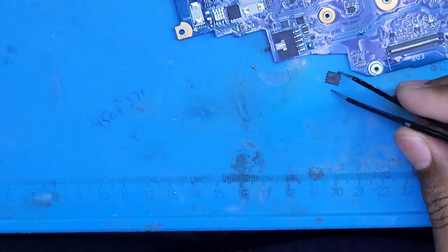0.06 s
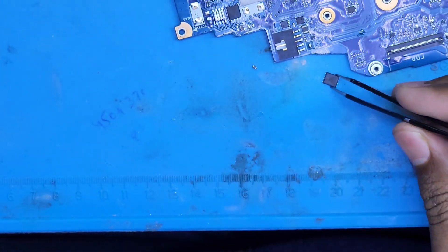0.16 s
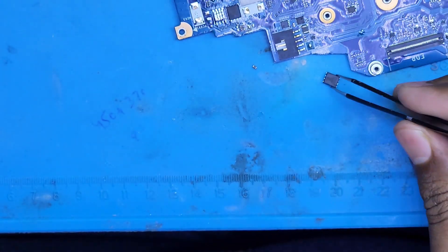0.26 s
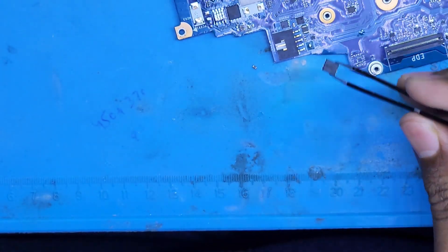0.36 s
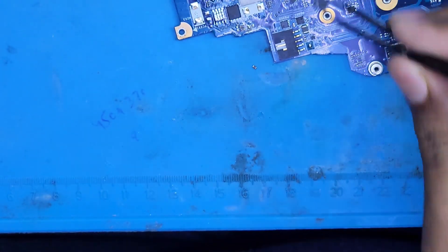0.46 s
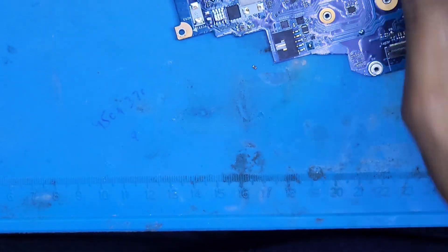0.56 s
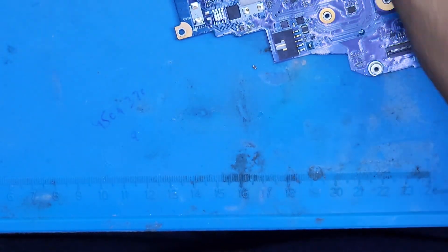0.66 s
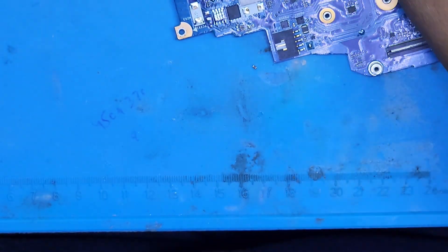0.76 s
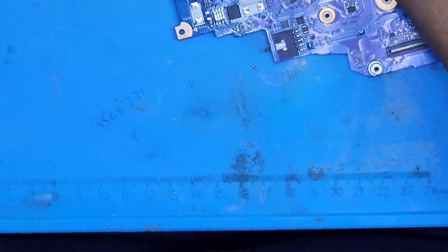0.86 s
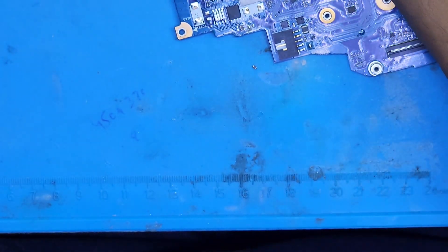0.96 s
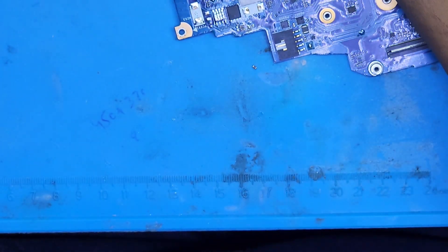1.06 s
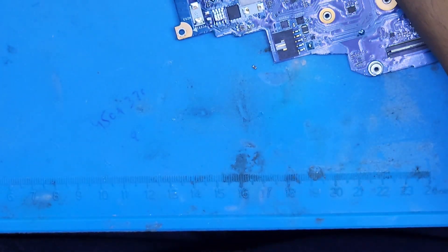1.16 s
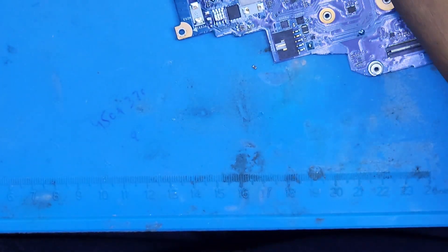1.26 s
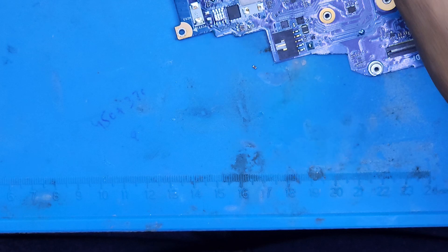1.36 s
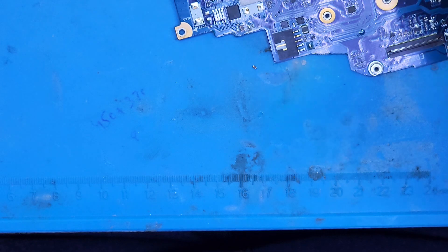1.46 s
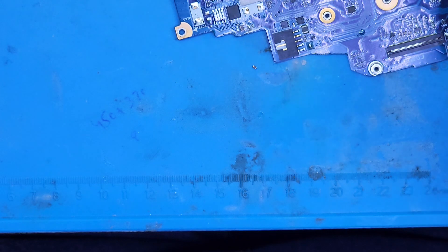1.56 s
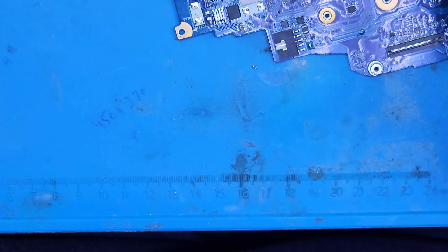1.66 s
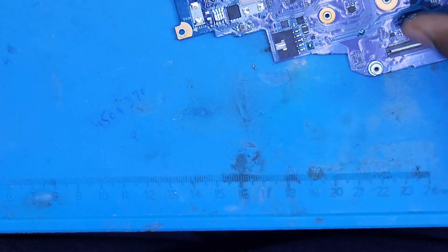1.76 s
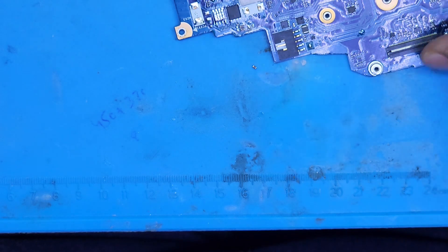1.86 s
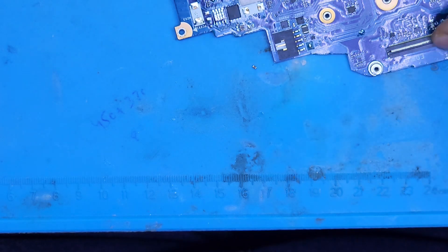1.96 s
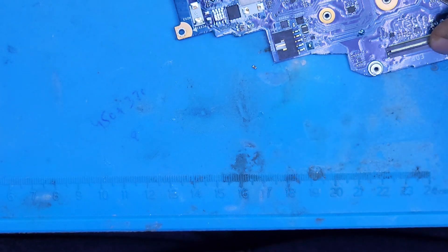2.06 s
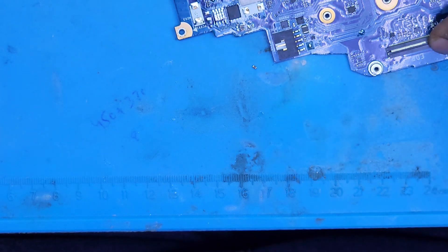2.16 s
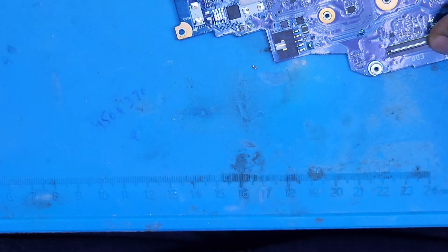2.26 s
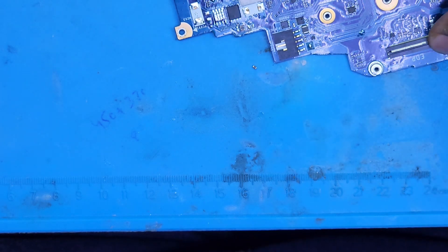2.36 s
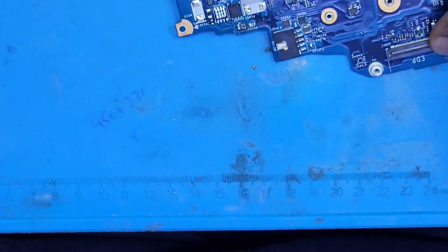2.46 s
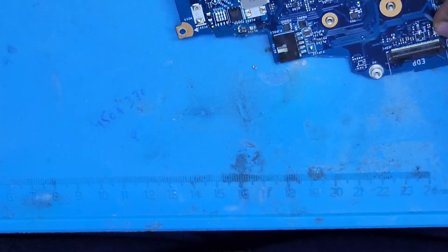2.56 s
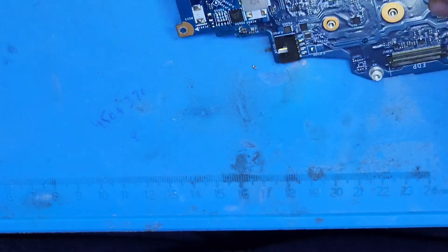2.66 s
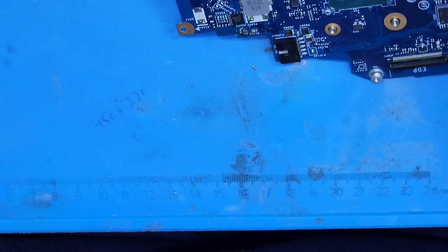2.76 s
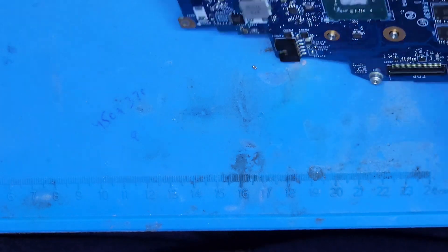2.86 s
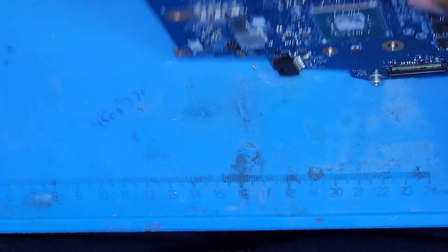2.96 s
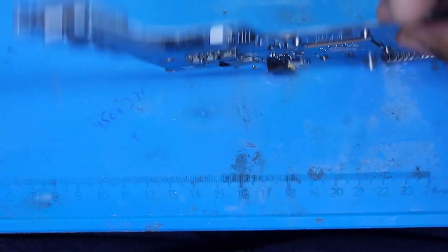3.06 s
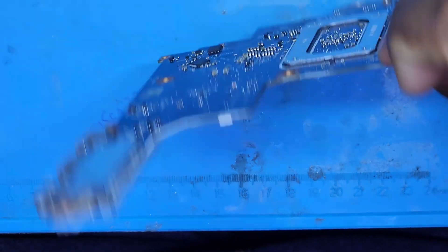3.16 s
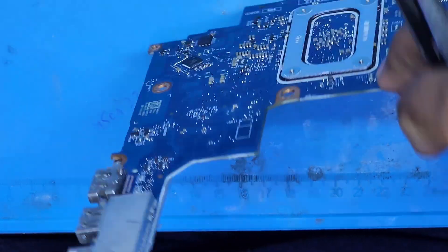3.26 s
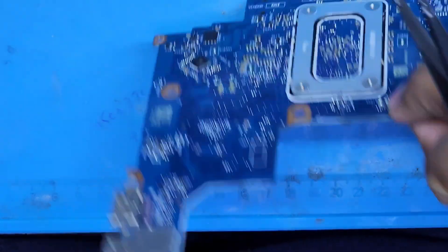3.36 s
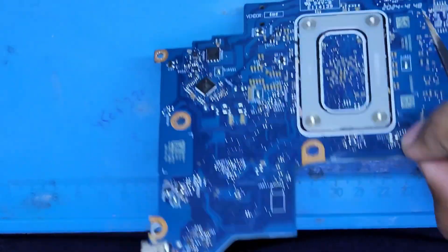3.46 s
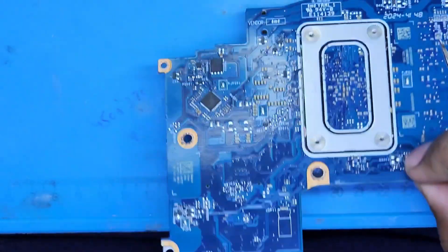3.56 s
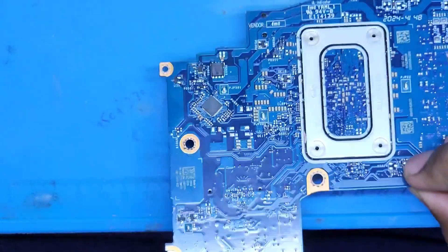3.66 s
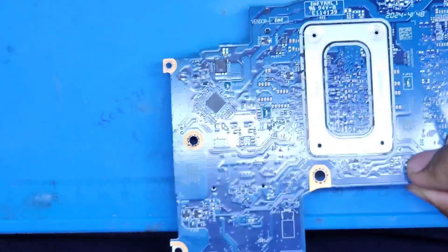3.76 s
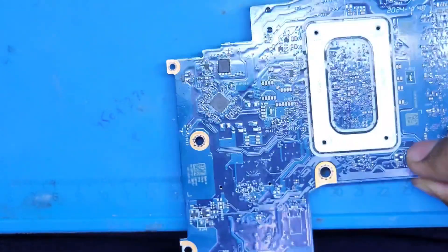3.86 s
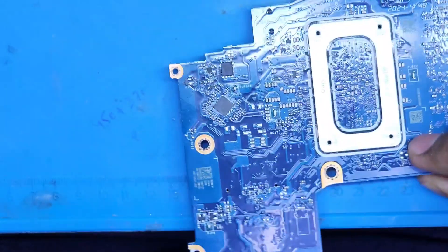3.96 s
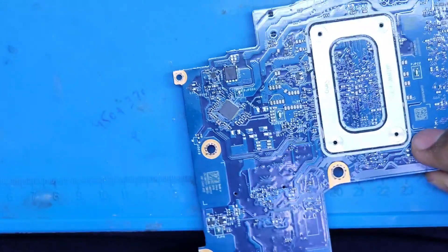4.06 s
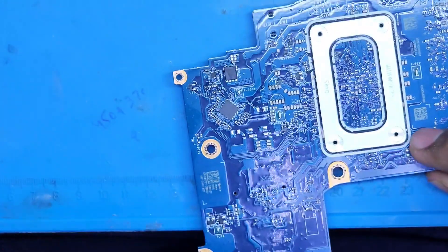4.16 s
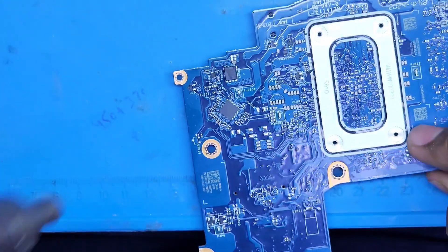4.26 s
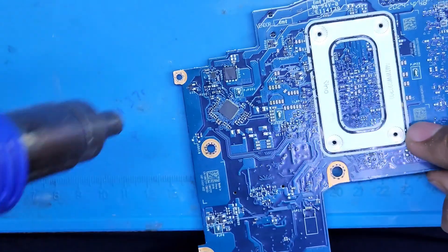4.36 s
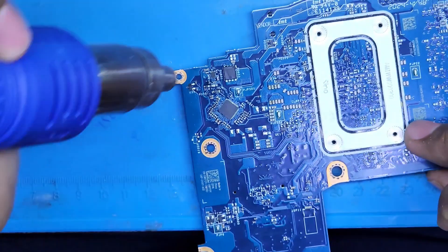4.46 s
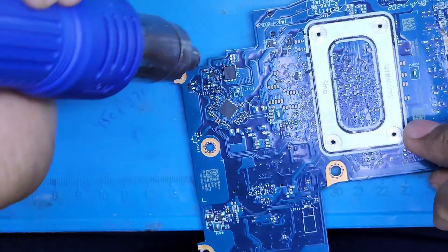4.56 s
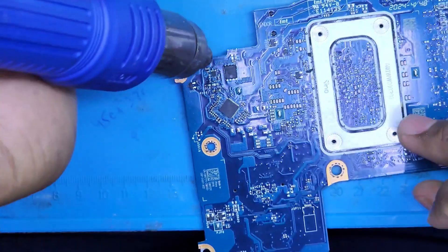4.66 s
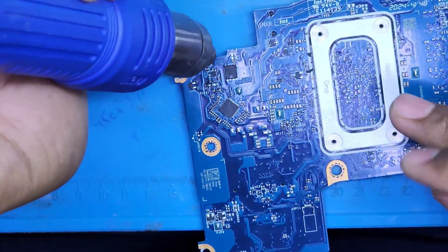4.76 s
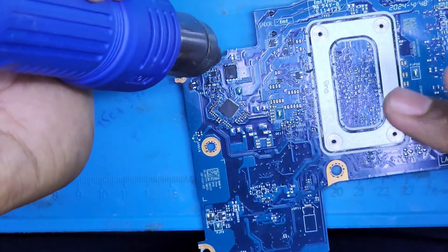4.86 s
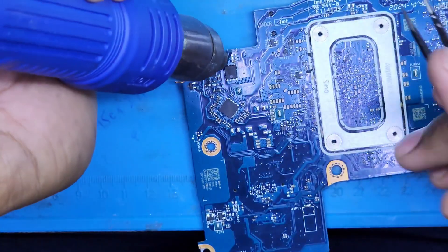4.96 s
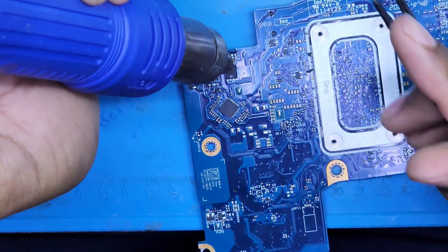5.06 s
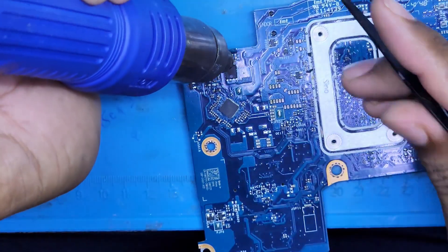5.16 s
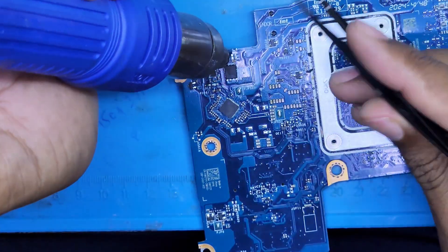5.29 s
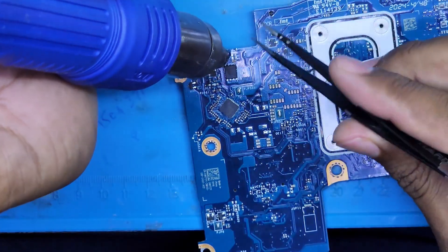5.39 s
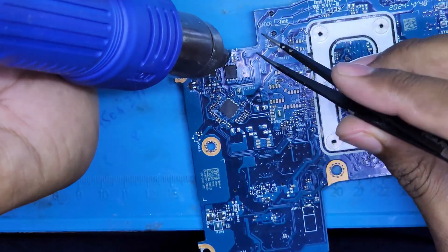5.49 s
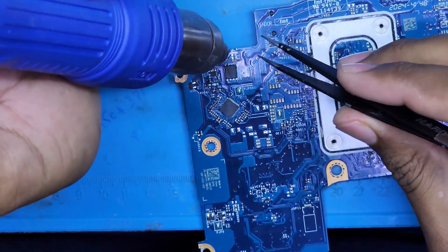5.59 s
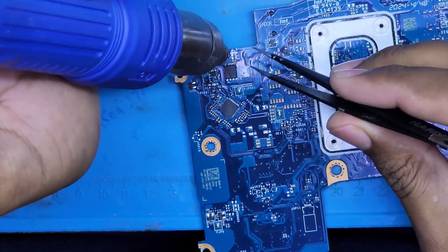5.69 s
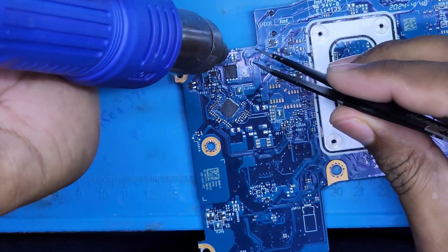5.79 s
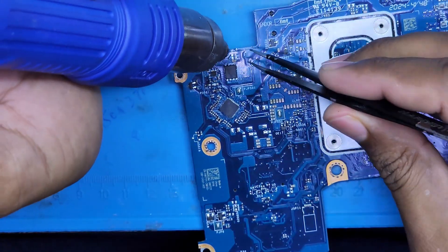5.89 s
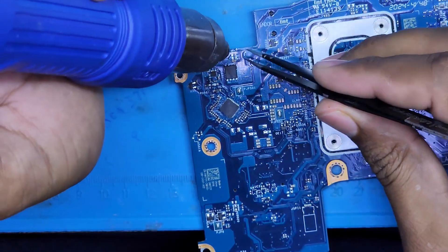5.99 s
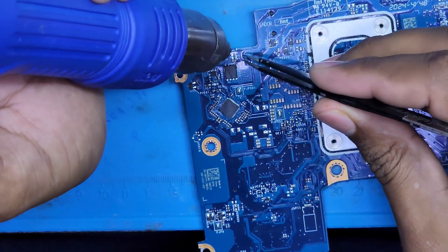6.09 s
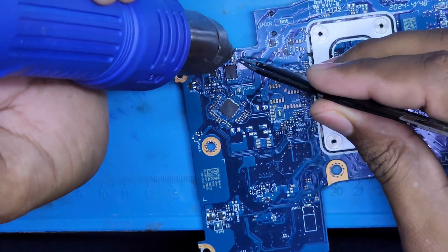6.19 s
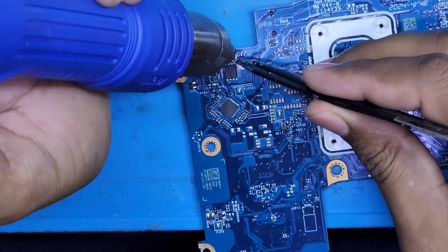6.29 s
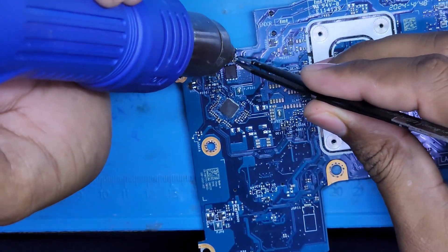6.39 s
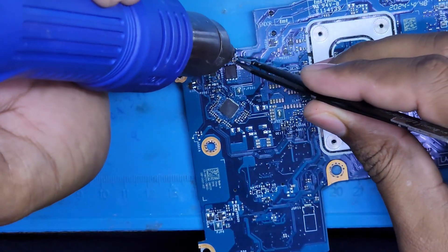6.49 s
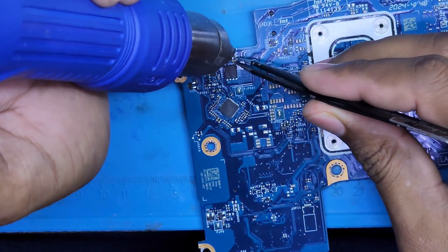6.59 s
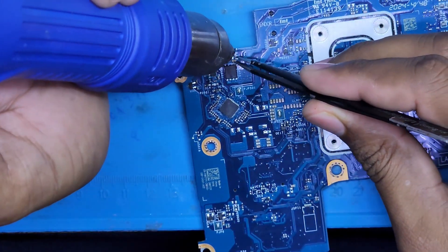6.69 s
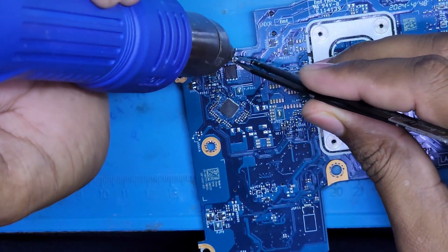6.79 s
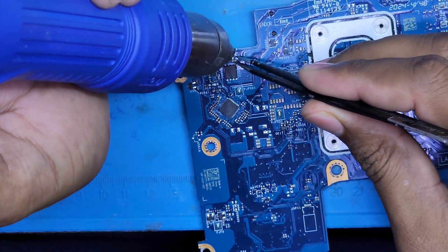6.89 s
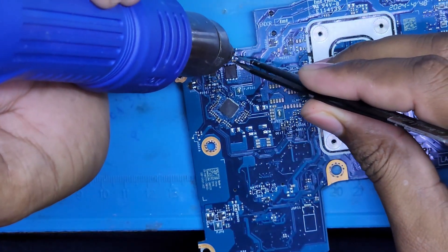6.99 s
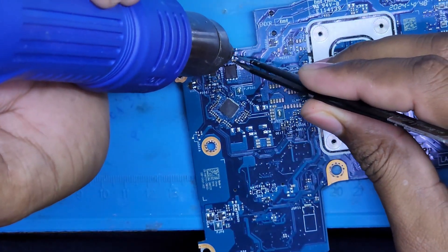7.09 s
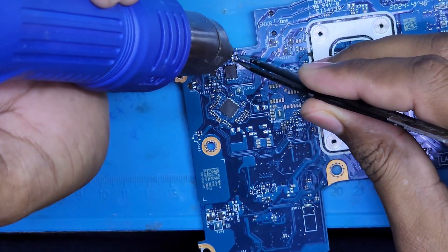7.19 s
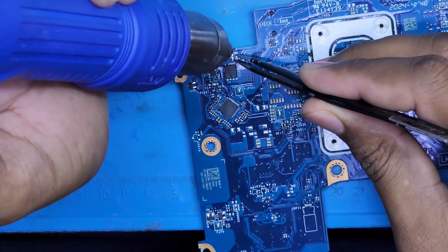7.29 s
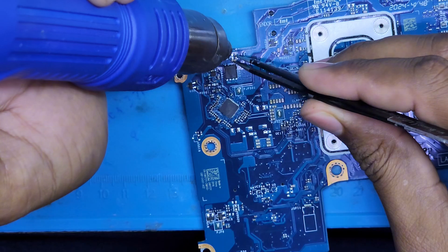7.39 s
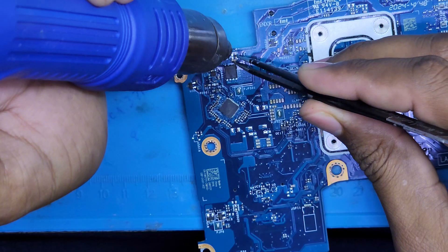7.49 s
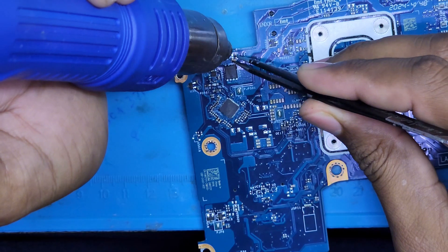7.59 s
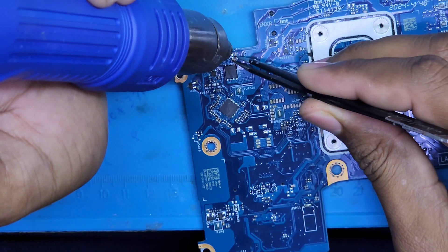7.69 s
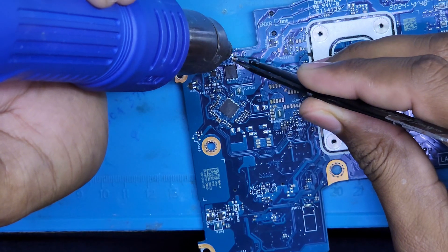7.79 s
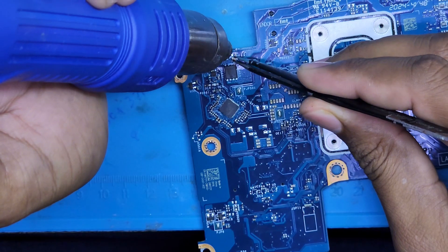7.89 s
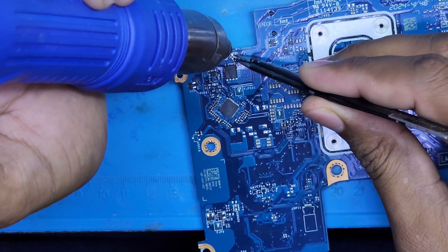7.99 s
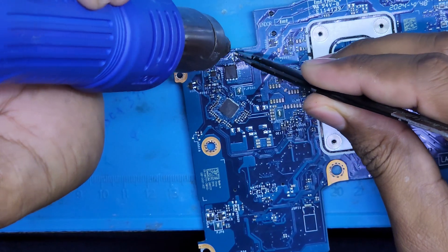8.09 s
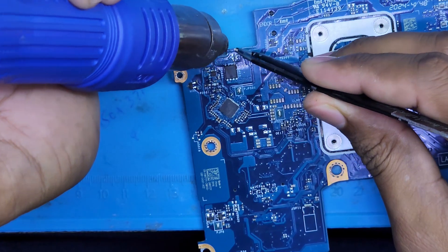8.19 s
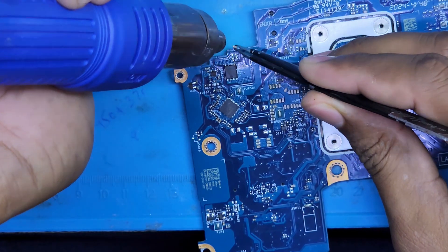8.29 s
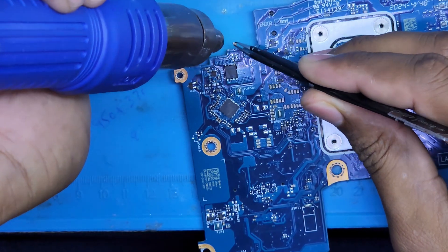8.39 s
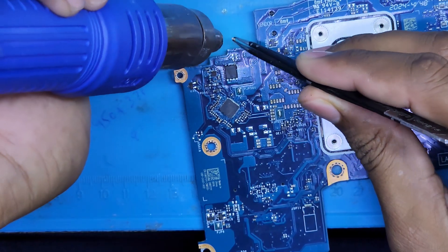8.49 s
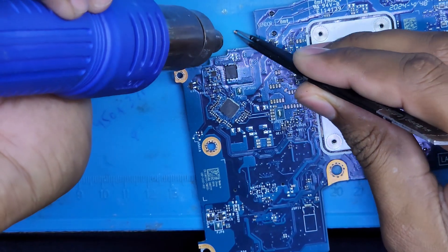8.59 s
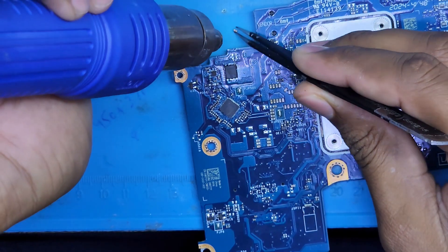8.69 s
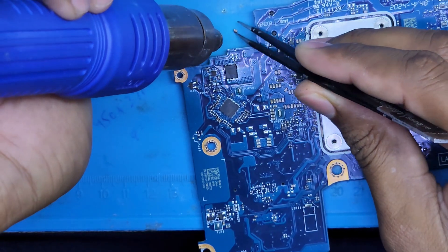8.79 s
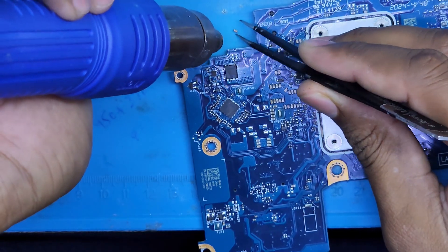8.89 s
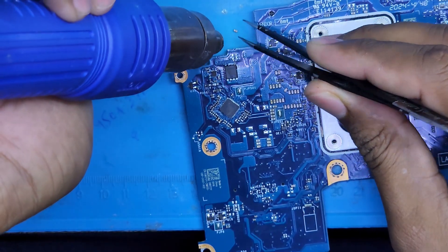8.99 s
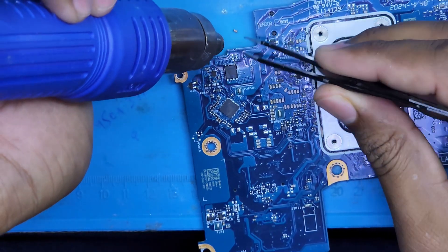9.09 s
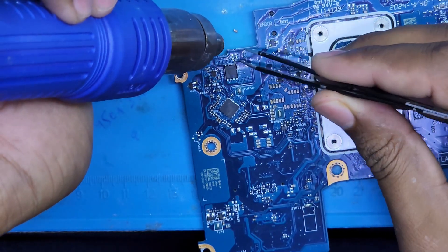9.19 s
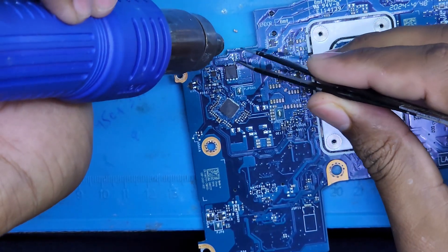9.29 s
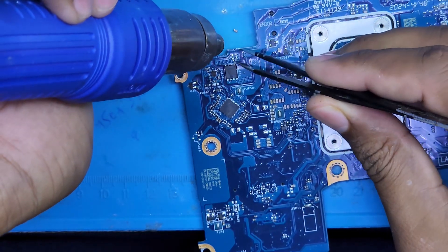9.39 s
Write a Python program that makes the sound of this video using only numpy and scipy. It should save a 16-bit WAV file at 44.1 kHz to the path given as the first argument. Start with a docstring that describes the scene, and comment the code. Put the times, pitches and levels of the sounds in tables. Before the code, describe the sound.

In a small hard room, a hot air gun runs throughout with a soft low rush, thin whine and faint high hiss. A click and light scratches come first, then a quiet gap. A board is dragged over the mat with a bright scrape, turned and set down with dull bench knocks and a hard clack. Later another thump and small, delicate tweezer clicks follow. One microphone above the bench picks up the low thuds strongly.

```python
"""Repair bench in a small hard room, where a hot air rework gun blows steadily.
Gun: coloured noise for fan rush and hiss, wavering sines for a thin whine, low hum and drones.
A circuit board is dragged over the mat, turned and set down: swelling bench modes, board modes and
noise cracks make its knocks, which reach the microphone through the bench; force-shaped noise slides.
Tweezers click and scratch, heard mostly by way of the room: dense noise clouds and brief steel rings."""
import sys
import numpy as np
from scipy import signal
from scipy.fft import rfft, irfft, next_fast_len
from scipy.io import wavfile

SR = 44100
rng = np.random.default_rng(int(sys.argv[2]) if len(sys.argv) > 2 else 0)


def dump(signal):
    """Clip the signal to [-1, 1] and save it as 16-bit WAV at the path in sys.argv[1]."""
    limited = np.clip(np.atleast_2d(signal).T, -1, 1)
    pcm = np.round(limited * 32767).astype(np.int16)
    wavfile.write(sys.argv[1], SR, pcm)


N = 416744
TIME = np.arange(N) / SR
EVENT_TIME = np.arange(SR // 2) / SR


def gain_of(db):
    """Decibels to amplitude gain."""
    return 10 ** (np.asarray(db) / 20)


def evened(x):
    """Scales to an rms of one."""
    return x / np.sqrt(np.mean(x ** 2) + 1e-20)


def read(points, hz):
    """Interpolates a dB spectrum on a log-frequency axis."""
    point_hz, point_db = np.transpose(points)
    return np.interp(np.log(hz + 1), np.log(point_hz + 1), point_db)


def add(mix, start_s, sound):
    """Mixes a sound in at its start time, cut at the end of the mix."""
    part = mix[max(round(start_s * SR), 0):][:len(sound)]
    part += sound[:len(part)]


def coloured(x, points):
    """Filters a sound by a dB spectrum."""
    size = next_fast_len(len(x))
    bin_hz = np.fft.rfftfreq(size, 1 / SR)
    return irfft(rfft(x, size) * gain_of(read(points, bin_hz)), size)[:len(x)]


def noise(points, size=N):
    """Coloured noise with an rms of one."""
    return evened(coloured(rng.standard_normal(size), points))


def drift(rate_hz):
    """Random fluctuation with an rms of one, given a new target rate_hz times a second."""
    knots = rng.standard_normal(4096)
    return evened(np.interp(TIME * rate_hz, np.arange(len(knots)), knots))


def tone(hz, rms_db, wander_hz, flutter_db):
    """A motor tone: a sine that wavers in pitch and level."""
    turns = np.cumsum(hz + wander_hz * drift(7)) / SR + rng.random()
    level_db = rms_db + flutter_db * drift(9)
    return np.sqrt(2) * gain_of(level_db) * np.sin(2 * np.pi * turns)


def air_gun(room_db=-7, room_t60_s=0.35, low_flutter_db=1.3):
    """Turbulent air as broadband noise, the fan's whine and the blower's low drones as tones."""
    # Rush of fan and air. Each row: frequency in Hz, level in dB per Hz.
    rush_spectrum = [(15, -23), (38, 1), (62, -6), (80, -16.5), (105, -17.5), (150, -14), (205, -27),
                     (285, -15), (355, -21), (450, -17), (540, -25), (740, -21.5), (960, -28), (1550, -29),
                     (2350, -48), (3200, -70)]
    # Faint high hiss. Each row: frequency in Hz, level in dB per Hz.
    hiss_spectrum = [(1500, -20), (2800, -8), (3200, -1), (3700, -4.5), (4700, 6), (5600, 2), (6800, -4.5),
                     (8700, -1.5), (9800, -7), (11600, -4.5), (12500, 5), (14100, -7), (15200, 3),
                     (16000, -7)]
    # Steady fan motor tones. Each row: frequency in Hz, level in dB rms.
    whine_tones = [(289, -73), (461, -73), (1199.5, -64), (1599.5, -75.5), (1782, -86.5), (2186, -100.5),
                   (2444, -96.5)]
    # Hum carried by the bench. Each row: time in seconds, level in dB rms.
    hum_levels = [(0, -62.5), (2, -70), (2.4, -55), (5.85, -58.5), (6.15, -46), (6.75, -45.5),
                  (7.45, -57.5), (8.05, -44.5), (9.45, -48.5)]
    # Blower drone, level in pitch at first, then sagging towards the end.
    # Each row: time in seconds, pitch in Hz, level in dB rms.
    drone_path = [(0, 114, -71), (3.5, 114.2, -58.5), (6.6, 113.9, -59), (9.45, 107.2, -62)]
    # Lower drone that beats with it. Each row: time in seconds, level in dB rms.
    beat_levels = [(0, -75.5), (6.6, -68.5), (7.6, -61), (8.4, -65)]
    rush_db, hiss_db = -50.5, -74.5
    hum_hz, beat_hz = 51.6, 99.4

    rush = gain_of(rush_db + 1.24 * drift(9)) * noise(rush_spectrum)
    hiss = gain_of(hiss_db + 0.9 * drift(6.8)) * noise(hiss_spectrum)
    reflected_hiss = gain_of(room_db) * room(hiss, room_t60_s)
    whine = sum(tone(hz, db, wander_hz=0.73, flutter_db=1.82) for hz, db in whine_tones)
    hum_db = np.interp(TIME, *np.transpose(hum_levels))
    hum = tone(hum_hz, hum_db, wander_hz=0.35, flutter_db=low_flutter_db)
    point_s, point_hz, point_db = np.transpose(drone_path)
    drone_hz = np.interp(TIME, point_s, point_hz)
    drone_db = np.interp(TIME, point_s, point_db)
    drone = tone(drone_hz, drone_db, wander_hz=0.2, flutter_db=low_flutter_db)
    beat_db = np.interp(TIME, *np.transpose(beat_levels))
    beat = tone(beat_hz, beat_db, wander_hz=0.78, flutter_db=low_flutter_db)
    return rush + hiss + reflected_hiss + whine + hum + drone + beat


def thud(t, corner_hz, ring_factor):
    """The bench swells and dies within a few cycles; a soft blow spares its higher modes."""
    # Low modes of bench and mat. Each row: frequency in Hz, relative level in dB, swell time in
    # seconds before the ring factor, direction (+1 lifts the microphone, -1 lowers it).
    bench_modes = [(55.6, -26, 0.017, 1), (65.7, -24.5, 0.033, 1), (109, -7.5, 0.0024, 1),
                   (134, 0, 0.0034, -1), (264.6, -5, 0.0037, 1), (318.7, -3, 0.004, 1),
                   (353, -19, 0.0041, 1), (608, -3.5, 0.0034, 1), (760, -11, 0.0063, 1)]
    out = np.zeros(len(t))
    for hz, db, swell_s, direction in bench_modes:
        u = t / (swell_s * ring_factor)
        swell = u * np.exp(1 - u)
        share = np.sign(direction) / np.hypot(1, (hz / corner_hz) ** 3)
        out += share * gain_of(db) * swell * np.sin(2 * np.pi * hz * t)
    return out


def clack(t, corner_hz, clack_db, reach=7):
    """The board's modes ring briefly; harder blows reach higher modes."""
    # Circuit board modes. Each row: frequency in Hz, relative level in dB, t60 in seconds.
    board_modes = [(915, -1.5, 0.033), (1100, 0.5, 0.035), (1384, -2, 0.012), (1370, 9, 0.015),
                   (1580, -7, 0.0058), (2560, -32, 0.046), (2700, -38.5, 0.012)]
    out = np.zeros(len(t))
    for hz, db, t60_s in board_modes:
        share = 1 / np.hypot(1, (hz / (reach * corner_hz)) ** 2)
        decay = gain_of(clack_db + db - 60 * t / t60_s)
        out += share * decay * np.sin(2 * np.pi * (hz * t + rng.random()))
    return out


def knocks(crack_base_t60_s=0.04, crack_delay_s=0.002, contact_s=0.0017, room_db=-33, room_t60_s=0.94):
    """A blow thumps the bench, rings the board and adds a small crack that grows with hardness."""
    # Knocks on the bench. Each row: start in seconds, relative thud level in dB,
    # hardness as a corner in Hz, ring length as a factor, relative clack level in dB.
    blows = [(2.737, -5, 145, 1.68, -40), (2.806, -24, 130, 2.9, -70), (2.8196, -16, 280, 0.89, -39.5),
             (3.026, -32, 150, 1.6, -56), (3.043, -31, 149, 1.06, -65), (3.213, -30.5, 141, 1.2, -74),
             (3.397, -35, 130, 1.3, -71), (3.501, -33.5, 450, 0.78, -50), (3.5091, -9, 370, 0.98, -24.5),
             (3.556, -34.5, 454, 0.47, -53), (3.598, -29.5, 130, 1.3, -37), (5.5253, -8.5, 188, 1.3, -29.5)]
    # Crack of hard parts meeting. Each row: frequency in Hz, level in dB per Hz.
    crack_spectrum = [(1000, 5), (2400, 4.5), (3300, -42), (4600, 1.5), (5300, -6), (6300, -11),
                      (9000, -11.5), (11500, 0.5), (15500, -13)]
    # corner of a soft blow, its crack level against the thud, and growth with hardness
    soft_hz, soft_crack_db, crack_db_per_octave = 144, -44, 16

    out, t = np.zeros(N), EVENT_TIME
    press = 1 - np.exp(-(2 * t / contact_s) ** 2)  # the mat cushions the start
    for start_s, thud_db, corner_hz, ring_factor, clack_db in blows:
        thump = gain_of(thud_db) * thud(t, corner_hz, ring_factor)
        add(out, start_s, press * (thump + clack(t, corner_hz, clack_db)))
        hardness_octaves = np.log2(corner_hz / soft_hz)
        crack_db = thud_db + soft_crack_db + crack_db_per_octave * hardness_octaves
        crack_decay = gain_of(crack_db - 60 * t / (crack_base_t60_s * ring_factor))
        add(out, start_s + crack_delay_s, crack_decay * noise(crack_spectrum, size=len(t)))
    return out + gain_of(room_db) * room(out, room_t60_s)


def slides(grain_db=1.5, clump_db=2.0, room_db=-12, room_t60_s=0.23):
    """Each stroke swells, holds and fades; fine stick and slip makes a bright, slightly grainy hiss."""
    # Strokes of tweezers and board. Each row: start of full force in seconds, hold in seconds,
    # level in dB.
    strokes = [(.18, .04, -67.5), (.395, .02, -54.5), (.474, .02, -62.5), (2.428, .02, -54),
               (2.455, 0.059, -34), (2.54, 0.015, -49.5), (2.684, .028, -47.5), (2.82, .05, -69),
               (2.92, 0.013, -59.5), (4.08, 0.022, -68), (6.33, 0.024, -73), (6.53, 0.026, -71.5),
               (9.34, 0.12, -73)]
    # Colour of sliding. Each row: frequency in Hz, level in dB per Hz.
    slide_spectrum = [(100, -58), (350, -15.5), (800, -18.5), (1500, -25), (2500, -31.5), (3600, -32),
                      (5000, -17), (6000, -19.5), (7200, -25.5), (8900, -14.5), (10500, -4), (11700, -1.5),
                      (14500, -10.5), (15700, -23)]
    # times between full force and the rest level, on a straight dB slope
    attack_s, release_s, rest_db = 0.044, 0.078, -84

    force = np.zeros(N)
    for full_s, hold_s, db in strokes:
        before = np.maximum(full_s - TIME, 0) / attack_s
        after = np.maximum(TIME - full_s - hold_s, 0) / release_s
        away = np.minimum(before + after, 10)
        force = np.maximum(force, gain_of(db - abs(db - rest_db) * away))
    grain = gain_of(grain_db * drift(300) + clump_db * drift(70))
    rub = force * grain * noise(slide_spectrum)
    return rub + gain_of(room_db) * room(rub, room_t60_s)


def clicks(early_t60_s=0.23, late_t60_s=0.47, late_db=-12, hold_s=0.0033, level_db=-2.5):
    """Each click arrives as a dense cloud of reflections that builds, drops fast and then lingers."""
    # Light clicks of tweezers and board. Each row: start in seconds, relative level in dB,
    # brightness in dB per octave, relative woody body in dB, main resonance in Hz, rise in seconds.
    contacts = [(0.2401, -32, -1, 9.5, 1290, 0.0058), (1.282, -60, -4, 1, 5000, 0.0056),
                (1.337, -60, -3, -6, 7000, .007), (1.973, -56.5, -1.5, 6, 1500, 0.0092),
                (2.083, -49.5, -1.5, -7, 1500, 0.0075), (2.126, -63, -6, -8, 3200, .004),
                (2.706, -38, -4, 1.5, 1800, 0.0054), (3.249, -45, -1.5, 2, 1310, 0.0044),
                (3.333, -53.5, 0, -1, 1500, .012), (3.595, -55, -2.5, 14, 780, 0.002),
                (3.653, -55.5, -2.5, -3, 1500, 0.018), (3.771, -50, -5, 1, 1780, .002),
                (3.945, -50.5, -3.5, 4, 1740, 0.0034), (4.381, -46.5, -4.5, 1.5, 7160, 0.0091),
                (5.540, -47.5, 0, 8, 6000, 0.0093), (5.584, -51.5, -12, -3, 3920, 0.0049),
                (5.992, -30.5, -7, -5, 4740, .007), (6.563, -57.5, -1, 8.5, 1500, 0.012),
                (6.750, -57, -1.5, 13.5, 1580, 0.0093), (6.974, -42.5, -7, 2.5, 1760, 0.0076),
                (7.096, -51, -4.5, -3, 4650, 0.0035), (7.150, -49.5, -6.5, 4, 1870, 0.0062),
                (7.32, -57, -9.5, 8.5, 1700, .004), (7.484, -60.5, -3.5, 2, 1500, .006),
                (8.289, -55, -10.5, 1, 3180, 0.015), (8.330, -63, -11, -8, 3250, .016),
                (8.38, -59.5, -0.5, -4, 3250, .004), (8.722, -52.5, -11.5, -5, 2050, .003),
                (8.779, -49.5, -8, -2.5, 2250, 0.017), (9.055, -48, -11, -7.5, 2230, 0.0045),
                (9.178, -43.5, -10.5, -3.5, 2270, 0.0036)]
    # Colour shared by all clicks. Each row: frequency in Hz, level in dB.
    shared_colour = [(60, -35), (250, -1.5), (1030, -3.5), (1300, -0.5), (1750, -3), (2100, -8),
                     (2700, -9.5), (3800, -5.5), (4900, -2.5), (6500, -3), (9000, -0.5), (12700, 4),
                     (14200, -4.5), (15500, 1.5)]
    # brightness tilts the spectrum about the pivot, from the lower edge upward
    tilt_pivot_hz, tilt_from_hz = 4850, 2030
    resonance_db, width_octaves = 7, 0.2
    split_hz, body_db, body_decay_factor = 2100, 3, 0.55  # the woody body dies sooner than the treble

    out, t = np.zeros(N), EVENT_TIME
    hz = np.geomspace(40, SR / 2, num=400)
    tilt_octaves = np.log2(np.maximum(hz, tilt_from_hz) / tilt_pivot_hz)
    body_filter = signal.butter(4, split_hz, fs=SR, output="sos")
    for start_s, db, tilt_db, wood_db, resonance_hz, rise_s in contacts:
        # the spot that is touched favours one resonance
        boost_db = resonance_db / (1 + (np.log2(hz / resonance_hz) / width_octaves) ** 2)
        colour_db = read(shared_colour, hz) + db + tilt_db * tilt_octaves + boost_db
        cloud = coloured(rng.standard_normal(len(t)), np.column_stack([hz, colour_db]))
        body = signal.sosfiltfilt(body_filter, cloud)
        treble = cloud - body
        wood = gain_of(body_db + wood_db) * body
        for part, decay_factor in ((wood, body_decay_factor), (treble, 1)):
            age = np.maximum(t - rise_s - hold_s, 0) / decay_factor
            early = gain_of(-60 * age / early_t60_s)
            late = gain_of(late_db - 60 * age / late_t60_s)
            add(out, start_s, part * np.minimum(t / rise_s, 1) * np.hypot(early, late))
    return gain_of(level_db) * out


def tweezers(ring_t60_s=0.29, half_width_hz=420, rise_s=0.0052):
    """The steel arms ring briefly; reflections blur each mode into a narrow band."""
    # Firm contacts that ring the tweezers. Each row: start in seconds, relative level in dB.
    firm_contacts = [(5.994, -49), (6.978, -56), (9.18, -60)]
    # Modes of the steel arms. Each row: frequency in Hz, relative level in dB.
    steel_modes = [(4830, -6), (5060, -6), (12700, -1), (13150, -4)]
    out, t = np.zeros(N), EVENT_TIME
    for start_s, level_db in firm_contacts:
        ring = np.zeros(len(t))
        for hz, db in steel_modes:
            band = [(hz + offset * half_width_hz, band_db)
                    for offset, band_db in ((-1, -70), (-0.5, -5), (0, 0), (0.5, -5), (1, -70))]
            ring += gain_of(db) * noise(band, size=len(t))
        decay = gain_of(level_db - 60 * t / ring_t60_s)
        add(out, start_s, ring * decay * np.minimum(t / rise_s, 1))
    return out


def room(x, t60_s):
    """Diffuse answer of the small room: a decaying noise tail with unit energy."""
    t = EVENT_TIME
    tail = rng.standard_normal(len(t)) * gain_of(-60 * t / t60_s) * np.minimum(t / 0.0051, 1)
    return signal.fftconvolve(x, tail / np.linalg.norm(tail))[:len(x)]


def scene():
    """All sources at one microphone above the bench."""
    mix = air_gun() + knocks() + slides() + clicks() + tweezers()
    return mix[None]


def record(dry):
    """The recorder's band limit: a steep linear-phase low-pass."""
    edge_hz = 15830
    low_pass = signal.firwin(1023, edge_hz, window=("kaiser", 9), fs=SR)
    return signal.oaconvolve(dry, low_pass[None], "same")


dry = scene()
out = record(dry)
dump(out)
```